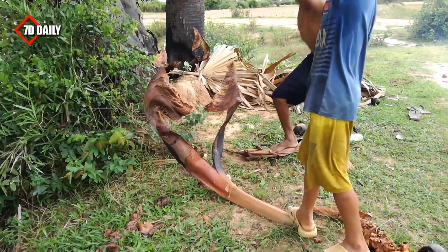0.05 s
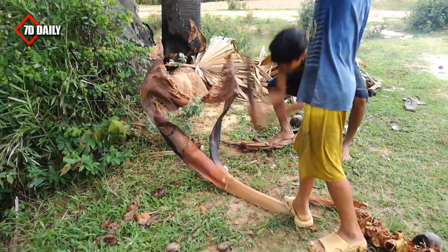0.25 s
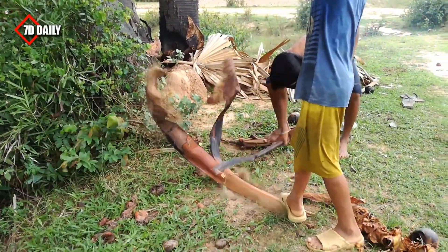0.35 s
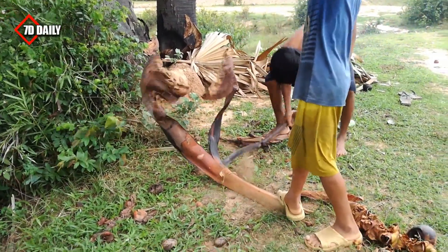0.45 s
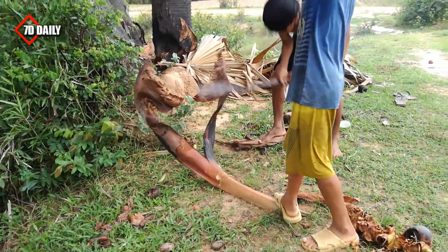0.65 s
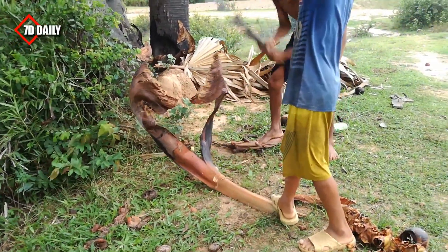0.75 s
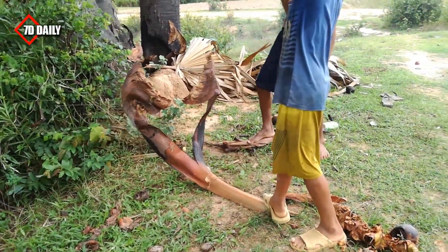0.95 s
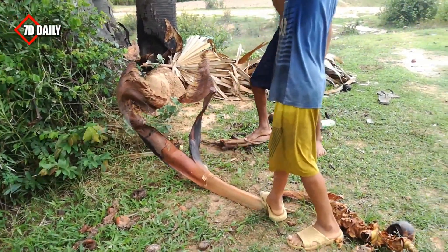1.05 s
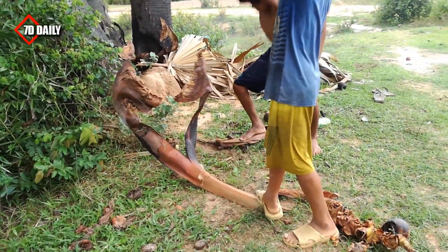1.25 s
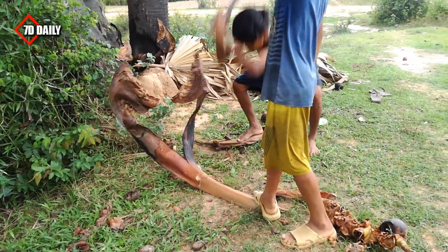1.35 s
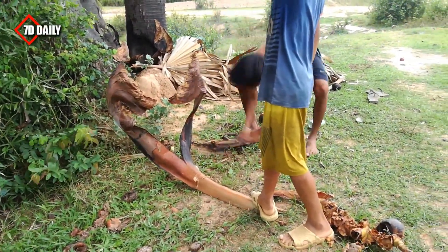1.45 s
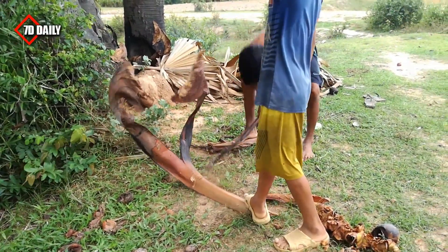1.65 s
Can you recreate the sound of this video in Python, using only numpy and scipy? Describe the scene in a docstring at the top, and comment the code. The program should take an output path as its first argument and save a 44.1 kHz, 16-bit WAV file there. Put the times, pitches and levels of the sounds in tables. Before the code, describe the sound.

A long knife chops twice into a woody palm stalk outdoors, with light wind buffeting the microphone.

```python
"""Light wind tumbles across two microphone ports over a faint hiss, outdoors. Then a long knife chops
twice into the woody base of a palm frond, and a soft knock follows each blow.
Wind and hiss are coloured noise. Each chop is a burst of random snaps (fibres), a set of fading sine
tones (the stalk) and one low push. Bushes scatter the crack and distant trees return it faintly: both
are patchy noise."""
import sys
import numpy as np
from scipy import signal
from scipy.fft import rfft, irfft, next_fast_len
from scipy.io import wavfile
from scipy.ndimage import uniform_filter1d, map_coordinates

SR = 44100
rng = np.random.default_rng(int(sys.argv[2]) if len(sys.argv) > 2 else 0)


def store_wav(level_fs):
    """Save 16-bit WAV to argv[1]."""
    pcm = np.round(np.clip(np.atleast_2d(level_fs), -1, 1) * 32767)
    wavfile.write(sys.argv[1], SR, pcm.T.astype(np.int16))


N = 74970  # length in samples, 1.7 s
T = np.arange(N) / SR  # time of each sample in seconds


def amp(db):
    """Turn decibels into gain."""
    return 10 ** (np.asarray(db) / 20)


def unit(x):
    """Scale to an average (rms) level of 1."""
    return x / np.sqrt(np.mean(x ** 2) + 1e-20)


def along(points, hz):
    """Read a curve of (Hz, value) points at any frequency, on a log axis."""
    point_hz, value = np.transpose(points)
    return np.interp(np.log(hz + 1), np.log(point_hz + 1), value)


def colour(points):
    """Turn (Hz, dB) points into a gain for each frequency."""
    return lambda hz: amp(along(points, hz))


def filtered(x, gain):
    """Shape the tone with a minimum-phase filter, so nothing sounds before its cause."""
    size = 2 * next_fast_len(N * 5 // 8, True)
    wanted = np.maximum(gain(np.fft.rfftfreq(size, 1 / SR)), 1e-6)
    cepstrum = irfft(np.log(wanted))
    # fold the second half onto the first: this makes the filter causal
    cepstrum[1:size // 2] *= 2
    cepstrum[size // 2 + 1:] = 0
    response = np.exp(rfft(cepstrum))
    return irfft(rfft(x, size) * response, size)[..., :N]


def stereo(pair, alike):
    """Blend two unrelated signals into a left and right of a given likeness."""
    likeness = along(alike, np.fft.rfftfreq(N, 1 / SR))
    turn = np.arccos(np.clip(likeness, -.99, .99)) / 2
    mid, side = irfft(rfft(pair) * [np.cos(turn), np.sin(turn)], N)
    return np.array([mid + side, mid - side])


def noise(gain, alike):
    """Make coloured stereo noise of rms 1."""
    return unit(filtered(stereo(rng.standard_normal((2, N)), alike), gain))


def decay(start_s, rise_s, t60_s):
    """Envelope that rises at start_s, then falls by 60 dB in t60_s."""
    since = np.maximum(T - start_s, 0)
    return (1 - np.exp(-since / rise_s)) * np.exp(-np.log(1000) * since / t60_s)


def swell(centre_s, half_length_s):
    """Bell-shaped envelope around centre_s."""
    return np.exp(-.5 * ((T - centre_s) / half_length_s) ** 2)


def wobble(knots_per_s):
    """A smooth random curve through a given number of knots a second."""
    return map_coordinates(rng.standard_normal(N // 100), [T * knots_per_s], mode="mirror")


# steady wind at the ports: time_s, level_db
WIND_LEVEL = [(0, -29.5), (.08, -48.5), (.14, -36), (.2, -50), (.33, -35.5), (.42, -39.5), (.48, -38.5),
              (.54, -50), (.6, -39.5), (.78, -37), (.92, -47.5), (1.02, -43), (1.13, -42.5), (1.26, -52),
              (1.36, -51.5), (1.46, -44), (1.57, -39), (1.7, -43.5)]
# tone of the steady wind: pitch_hz, relative_level_db (per Hz)
RUMBLE_TONE = [(10, -5.5), (25, -3.5), (55, 2.5), (100, -2.5), (180, -3), (300, -17), (400, -31),
               (550, -41.5), (900, -85.5)]
# eddies hitting the ports: centre_s, half_length_s, level_db, upper_edge_hz
EDDIES = [(0.043, 0.0081, -36, 650), (.079, 0.0064, -30, 324), (.332, 0.0092, -32, 88.5),
          (0.353, 0.0022, -35, 630), (0.372, 0.0023, -28, 417), (.389, 0.002, -28.5, 540),
          (0.423, 0.016, -45.5, 465), (0.462, 0.0039, -42, 372), (0.554, 0.0035, -39.5, 480),
          (0.584, 0.0091, -27.5, 274), (0.595, 0.0086, -32, 920), (0.611, 0.0047, -25, 1150),
          (0.623, 0.0026, -32, 1230), (0.665, 0.0043, -30, 770), (0.723, 0.005, -32, 730),
          (0.745, .004, -39, 710), (0.834, 0.0044, -32.5, 803), (.865, 0.0084, -45, 466),
          (1.108, 0.011, -41, 287), (1.132, 0.01, -37, 570), (1.19, 0.0081, -46, 365),
          (1.598, 0.0045, -36.5, 297), (1.62, 0.0059, -41.5, 417), (1.677, 0.013, -44, 370)]
# how alike the wind is at the two ports: pitch_hz, likeness (0 to 1)
PORTS_ALIKE = [(60, 0.85), (250, 1), (600, 0.91), (1200, 0.083)]
# the air reaches one port before the other: time_s, left_port_lag_s
PORT_LAG = [(0, -.0006), (.4, -.0006), (.54, .0006), (1.2, .0006), (1.35, -.0006), (1.7, -.0004)]
LUMPS_PER_S, LUMPS_DB = 54, 1  # the rumble surges
EDDY_LOW_HZ, EDDY_TILT, EDGE_STEEPNESS = 131, 1.05, 6.5


def wind():
    """Turbulent air presses on the ports: low rumble and brief, brighter eddies, lagging at one port."""
    level_db = np.interp(T, *np.transpose(WIND_LEVEL)) + LUMPS_DB * wobble(LUMPS_PER_S)
    air = amp(level_db) * noise(colour(RUMBLE_TONE), PORTS_ALIKE)
    for centre_s, half_length_s, eddy_db, edge_hz in EDDIES:
        def eddy_tone(hz):
            """Rise from the bass, slope down, then drop steeply at the upper edge."""
            ratio = hz / EDDY_LOW_HZ
            body = ratio / (1 + ratio ** 2) ** ((1 + EDDY_TILT) / 2)
            return body / np.sqrt(1 + (hz / edge_hz) ** (2 * EDGE_STEEPNESS))

        air += amp(eddy_db) * swell(centre_s, half_length_s) * noise(eddy_tone, PORTS_ALIKE)
    lag = np.interp(T, *np.transpose(PORT_LAG))
    left = np.interp(T - lag / 2, T, air[0])
    right = np.interp(T + lag / 2, T, air[1])
    return np.array([left, right])


# tone of the open field: pitch_hz, relative_level_db (per Hz)
HISS_TONE = [(100, -5), (600, -3), (1400, -1), (2400, -6.5), (4500, -8.5), (7000, -14.5), (10000, -23),
             (15500, -27.5)]
# how alike diffuse sound is, left and right (also used by the echoes): pitch_hz, likeness (0 to 1)
DIFFUSE_ALIKE = [(100, 0), (500, .15), (2000, 0)]
HISS_DB = -69.5


def field_hiss():
    """The faint hiss of the open field, as steady noise."""
    return amp(HISS_DB) * noise(colour(HISS_TONE), DIFFUSE_ALIKE)


# tone of the snapping fibres: pitch_hz, relative_level_db (per Hz)
CRACK_TONE = [(100, -16.5), (500, -3.5), (1500, 0.5), (3200, -2.5), (5500, -10.5), (8000, -20.5),
              (13000, -28.5), (16000, -25.5)]
# how alike the snaps are, left and right (also used by the knocks): pitch_hz, likeness (0 to 1)
CRACK_ALIKE = [(300, .98), (2000, .95), (5000, .4), (10000, .1)]
SNAPS_PER_S, CRACK_T60_S, CRACK_DB = 6000, 0.022, -21.5
EDGE_DB, EDGE_T60_S = -0.5, 0.014  # the first bite of the edge, over the crack


def fibres(start_s):
    """A dense burst of random snaps as fibres break, hardest as the edge enters."""
    snaps = (rng.random((2, N)) < SNAPS_PER_S / SR) * rng.choice([-1, 1], (2, N))
    crackle = unit(filtered(stereo(snaps, CRACK_ALIKE), colour(CRACK_TONE)))
    crack = decay(start_s, .0001, CRACK_T60_S)
    first_bite = amp(EDGE_DB) * decay(start_s, .0001, EDGE_T60_S)
    return amp(CRACK_DB) * crackle * (crack + first_bite)


# ways the stalk rings (modes); strength depends on where it is struck:
# pitch_hz, t60_s, first_cut_db, second_cut_db
STALK_MODES = [(199.8, 0.027, -1.5, -2), (300, 0.012, -21.5, -19.5), (403, 0.02, -2, -6.5),
               (709, 0.034, -12.5, -8.5), (789, 0.021, -5.5, -30.5), (990, 0.033, -17, -8),
               (1157, 0.022, -10.5, -6), (1445, 0.023, -15, -5), (1563, 0.032, -12, -19),
               (2146, 0.031, -20.5, -17), (2850, 0.01, -11.5, -10), (3090, 0.01, -12.5, -26),
               (4053, 0.017, -26, -39.5), (5180, 0.017, -18.5, -20)]
HEAVY_HZ, SWELL_CYCLES = 560, .15  # modes below this wait for the blade to stop; rise of a mode in cycles
RADIATE_HZ = 115  # the stalk radiates little sound below this


def stalk(start_s, bite_s, cut):
    """Fading sine tones: high modes ring as the edge enters, heavy ones when the blade stops."""
    out = np.zeros(N)
    for hz, t60_s, *levels_db in STALK_MODES:
        mode_start = start_s + bite_s / (1 + (hz / HEAVY_HZ) ** 4)
        tone = np.sin(2 * np.pi * hz * (T - mode_start))
        out += amp(levels_db[cut]) * decay(mode_start, SWELL_CYCLES / hz, t60_s) * tone
    return filtered(out, lambda hz: (hz ** 2 + 10) / np.sqrt(hz ** 4 + RADIATE_HZ ** 4))


PUSH_WIDTH_S = .0005


def push(start_s):
    """The stalk is shoved once as the blade stops: one low swing of pressure, without ring."""
    u = (T - start_s) / PUSH_WIDTH_S - 2
    return u * np.exp(-.5 * u ** 2)


GROUND_DB, GROUND_T60_S, GROUND_DELAY_S = -17, .045, .0045


def ground(x):
    """Close reflections from ground and trunk: a short noise tail, different on each side."""
    tail = rng.standard_normal((2, N)) * decay(GROUND_DELAY_S, .001, GROUND_T60_S)
    tail = tail / np.linalg.norm(tail[0])
    return amp(GROUND_DB) * signal.fftconvolve(x[None], tail, axes=1)[:, :N]


PATCHY_DB = 2.2  # unevenness of the foliage


def patchy(x):
    """Uneven foliage: patches of random gain in time and frequency."""
    spectrum = signal.stft(x, nperseg=512)[2]
    field = rng.standard_normal(spectrum.shape[1:])
    field = uniform_filter1d(field, size=3, axis=0)  # smooth over frequency
    field = uniform_filter1d(field, size=6, axis=1)  # smooth over time
    uneven = spectrum * amp(PATCHY_DB * unit(field))
    return unit(signal.istft(uneven, nperseg=512)[1][:, :N])


# tone of the scatter from the leaves: pitch_hz, relative_level_db (per Hz)
BUSH_TONE = [(80, -12), (250, 0), (500, 0.5), (1050, 1.5), (2000, -8.5), (3200, -8), (5500, -12.5),
             (8000, -21), (13000, -28.5), (16000, -29)]
# tone of its slow tail: pitch_hz, relative_level_db (per Hz)
LINGER_TONE = [(100, -6), (450, 1), (900, -0.5), (1500, -13.5), (3000, -18.5), (8000, -26), (15000, -47)]
BUSH_DB, BUSH_RISE_S, BUSH_T60_S = -18.5, 0.0025, .17
LINGER_DB, LINGER_T60_S = -43.5, 0.79


def bushes(start_s):
    """Leaves scatter the blow at once, as fading noise; its low part lingers."""
    bright = patchy(noise(colour(BUSH_TONE), DIFFUSE_ALIKE)) * decay(start_s, BUSH_RISE_S, BUSH_T60_S)
    low = patchy(noise(colour(LINGER_TONE), DIFFUSE_ALIKE)) * decay(start_s, BUSH_RISE_S, LINGER_T60_S)
    return amp(BUSH_DB) * bright + amp(LINGER_DB) * low


# tone of the far echo: pitch_hz, relative_level_db (per Hz)
TREES_TONE = [(300, -8.5), (900, -2.5), (1400, -6.5), (1900, 2), (2500, -9), (3200, 0.5), (4800, -8),
              (6500, -20), (15000, -28.5)]
TREES_DELAY_S, TREES_HALF_LENGTH_S, TREES_DB = .142, .026, -54


def trees(start_s):
    """Far trees return the blow late, as a soft swell of noise."""
    echo = patchy(noise(colour(TREES_TONE), DIFFUSE_ALIKE))
    return amp(TREES_DB) * echo * swell(start_s + TREES_DELAY_S, TREES_HALF_LENGTH_S)


RING_DB, RING_HZ, RING_WIDTH_HZ, RING_BEND_HZ_PER_S2 = -64, 1990, 90, 16000


def ring(centre_s, half_length_s):
    """A faint, narrow ring in the echo: slow noise carried on a tone that rises and sags in pitch."""
    flutter = signal.hilbert(noise(lambda hz: 1 / (1 + (hz / RING_WIDTH_HZ) ** 2), DIFFUSE_ALIKE))
    pitch_hz = RING_HZ - RING_BEND_HZ_PER_S2 * (T - centre_s) ** 2
    phase = 2 * np.pi * np.cumsum(pitch_hz) / SR
    return amp(RING_DB) * np.real(flutter * np.exp(1j * phase)) * swell(centre_s, half_length_s)


# the two chops: start_s, level_db, time_until_blade_stops_s, push_db, fibre_crack_db,
# treble_left_over_right_db, bush_scatter_db, far_echo_db, ring_delay_s, ring_half_length_s
CHOPS = [(0.2429, 1.5, .0032, -3, 0, -5.5, -1.5, 0.5, 0.15, .07),
         (1.3957, -1, 0.0017, -8.5, 6.5, -2, -1, -3, .14, 0.023)]
SHADOW_HZ = 3500  # direction is heard above this


def chops():
    """Each blow: fibre crack, push and knock of the stalk, and their echoes."""
    out = np.zeros((2, N))
    for cut, chop in enumerate(CHOPS):
        start_s, level_db, bite_s, push_db, crack_db, pan_db, bush_db, far_db, ring_delay_s, ring_half_s = chop
        knock = stalk(start_s, bite_s, cut) + amp(push_db) * push(start_s + bite_s)
        blow = knock + amp(crack_db) * fibres(start_s)

        def treble_tilt(half):
            """Give one side its half of the treble difference."""
            return lambda hz: amp(half * pan_db * hz ** 2 / (hz ** 2 + SHADOW_HZ ** 2))

        left = filtered(blow[0], treble_tilt(.5))
        right = filtered(blow[1], treble_tilt(-.5))
        direct = np.array([left, right])
        echo = amp(bush_db) * bushes(start_s) + amp(far_db) * trees(start_s)
        echo += ring(start_s + ring_delay_s, ring_half_s)
        out += amp(level_db) * (direct + ground(knock) + echo)
    return out


# soft knocks after the blows: start_s, scuff_db, t60_s, low_pass_corner_hz, stalk_ringing_db
KNOCKS = [(.3205, -26, 0.019, 1640, -19), (1.4830, -38.5, 0.036, 990, -28.5)]
KNOCK_RISE_S, KNOCK_LOW_HZ = 0.00027, 292


def knocks():
    """Dull, short contacts: a scuff of noise that rings the cut stalk again as it settles."""
    out = np.zeros((2, N))
    for cut, (start_s, scuff_db, t60_s, top_hz, ring_db) in enumerate(KNOCKS):
        def soft(hz):
            """Keep the middle: less bass, steeply less treble."""
            return hz / (hz + KNOCK_LOW_HZ) / np.sqrt(1 + (hz / top_hz) ** 10)

        out += amp(scuff_db) * noise(soft, CRACK_ALIKE) * decay(start_s, KNOCK_RISE_S, t60_s)
        ringing = stalk(start_s + KNOCK_RISE_S, KNOCK_RISE_S, cut)
        out += amp(ring_db) * filtered(ringing, soft)
    return out


def scene():
    """Wind and faint hiss, with the blows and soft knocks over them."""
    return wind() + field_hiss() + chops() + knocks()


CEILING, KNEE, TOP_HZ = 1, 15, 16200  # highest peak, sharpness of the rounding, band limit


def record(dry):
    """The recorder rounds off the highest peaks and keeps nothing above its band limit."""
    rounded = dry / (1 + np.abs(dry / CEILING) ** KNEE) ** (1 / KNEE)
    kept = np.fft.rfftfreq(2 * N, 1 / SR) < TOP_HZ
    return irfft(rfft(rounded, 2 * N) * kept)[:, :N]


dry = scene()
out = record(dry)
store_wav(out)
```